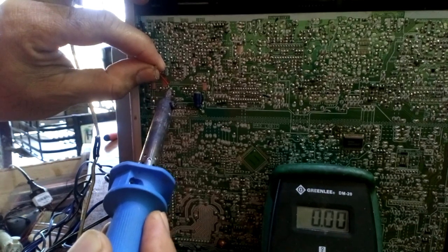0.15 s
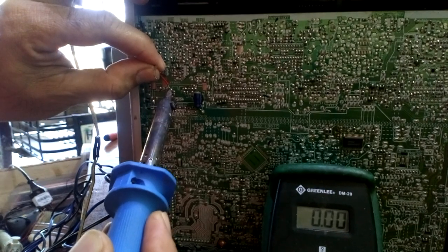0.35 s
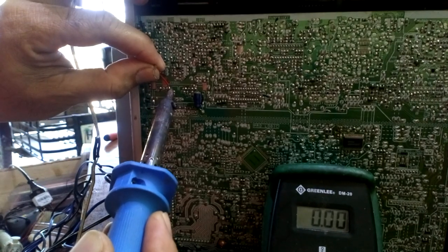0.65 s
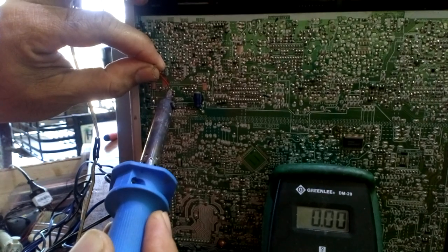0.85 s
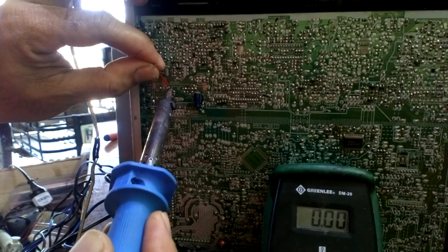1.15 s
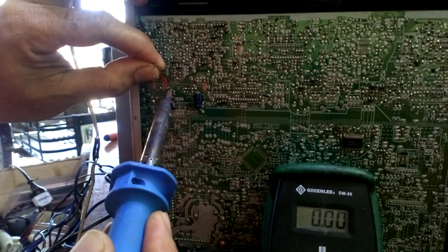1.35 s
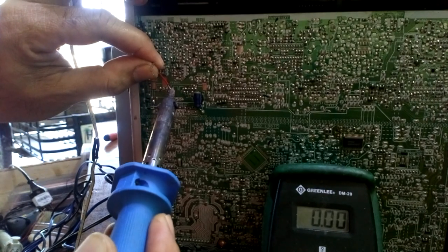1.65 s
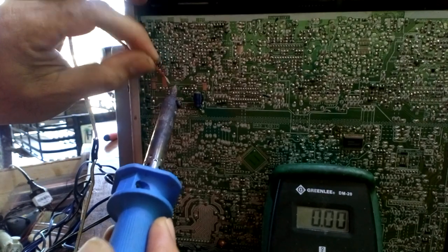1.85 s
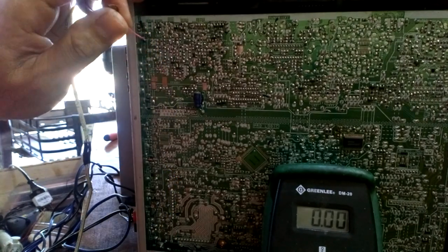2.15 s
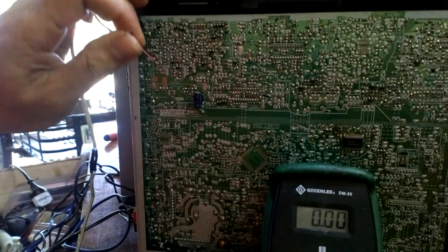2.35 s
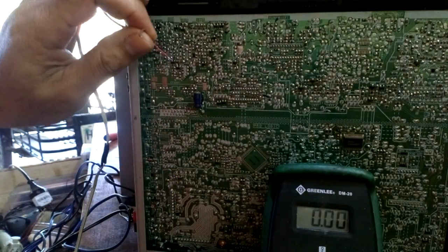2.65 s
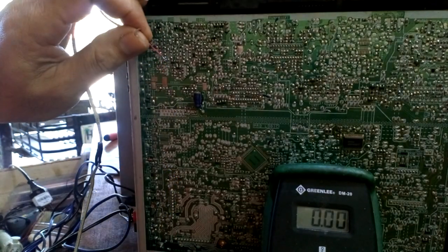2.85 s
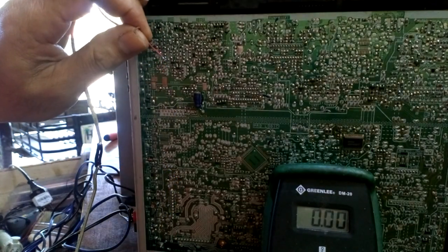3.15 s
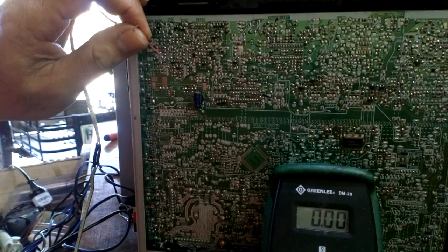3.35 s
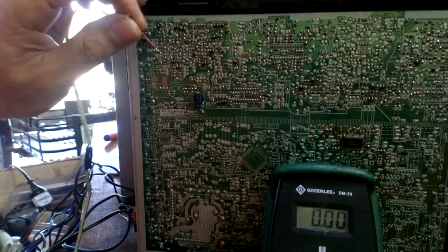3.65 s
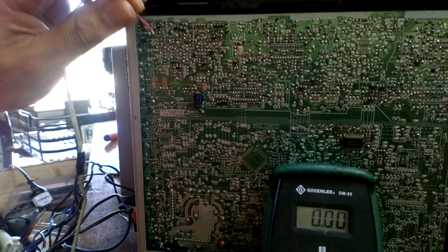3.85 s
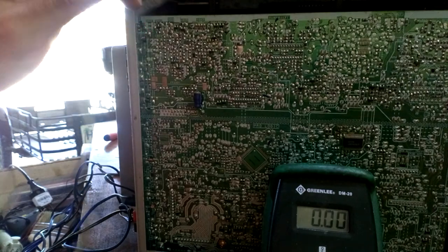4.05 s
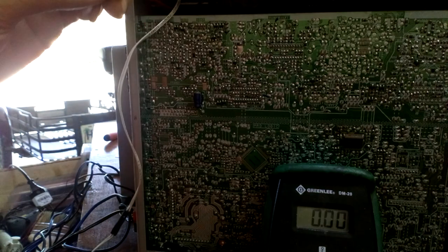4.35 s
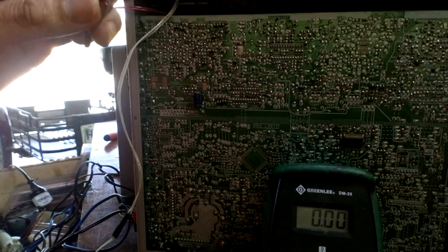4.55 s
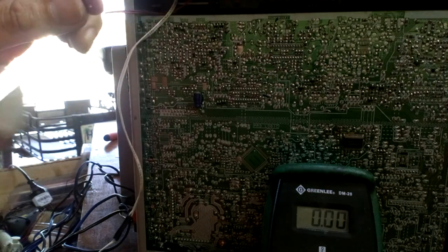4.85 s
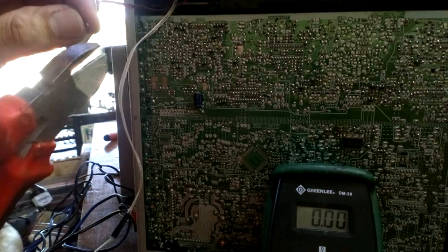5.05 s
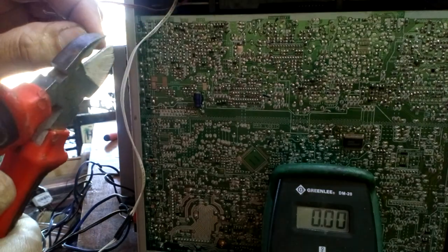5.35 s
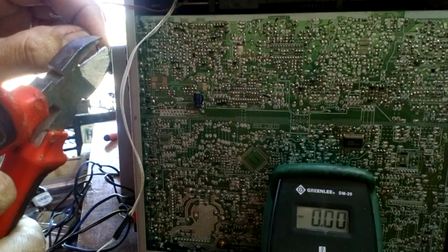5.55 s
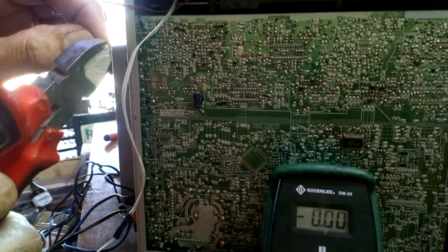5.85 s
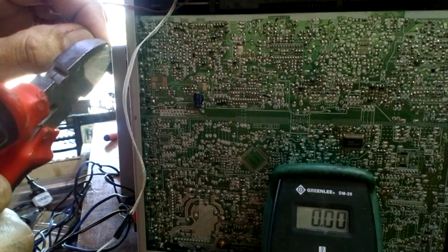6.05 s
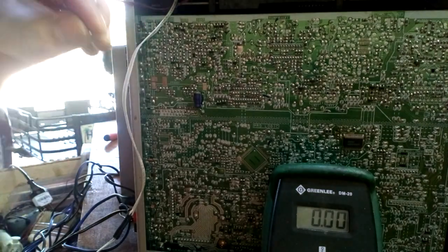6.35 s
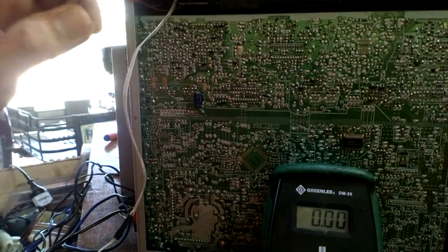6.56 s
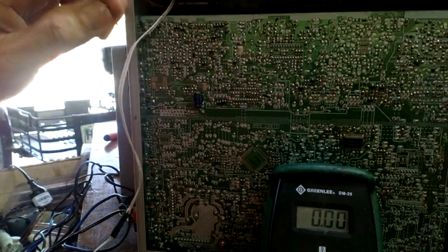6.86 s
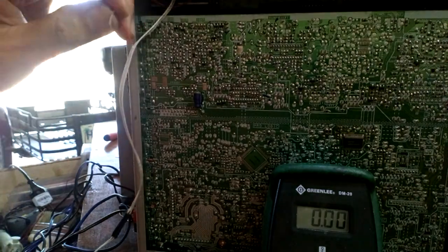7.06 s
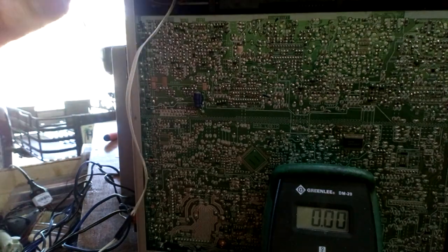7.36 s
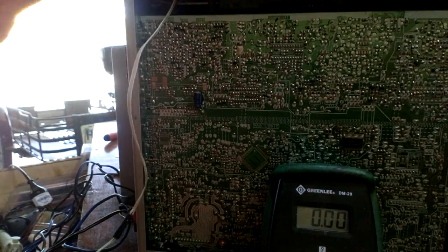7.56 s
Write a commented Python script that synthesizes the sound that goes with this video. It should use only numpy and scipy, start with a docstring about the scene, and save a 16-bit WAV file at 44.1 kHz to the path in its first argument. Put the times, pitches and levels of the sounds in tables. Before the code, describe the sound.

At a workbench in a small room, steady hiss and a very thin high whine continue under a distant rooster's falling last note. An engine outside slows to a low throb. After light clicks, a soldering iron knocks and scrapes into its springy metal stand, the coil ringing briefly. A hollow knock, soft rubs and tiny snips follow, then cutters clatter down onto the resonant bench. Close stereo microphones.

```python
"""Steady hiss and a thin electronic whine first; outside, a far rooster ends its crow and an engine slows down.
Place: a bench in a small room, two microphones near the work. Soft rubs and thumps, wire snips, an iron shoved
into its coil stand, then cutters dropped on the booming bench top. Air, friction and rubs are shaped noise;
engine, crow and whine are sums of harmonics; each contact is decaying modes plus noise bursts, and walls add
short echoes."""
import sys
import numpy as np
from scipy import signal
from scipy.fft import rfft, irfft, next_fast_len
from scipy.io import wavfile
from scipy.ndimage import map_coordinates

SR = 44100
rng = np.random.default_rng(int(sys.argv[2]) if len(sys.argv) > 2 else 0)


def waveform_to_disk(signal):
    """Save audio, clipped to [-1, 1], as 16-bit WAV at the path in sys.argv[1]."""
    frames = np.transpose(np.atleast_2d(signal))
    scaled = np.clip(frames, -1, 1) * 32767
    samples = np.round(scaled).astype(np.int16)
    wavfile.write(sys.argv[1], SR, samples)


N = 340011
TIME = np.arange(N) / SR  # s
AGE = np.arange(SR // 2) / SR  # s since one contact, half a second long


def amp(db):
    """Decibels to gain."""
    return 10 ** (np.asarray(db) / 20)


def unit(x):
    """Scaled to rms 1."""
    return x / np.sqrt(np.mean(x ** 2) + 1e-20)


def along(points, hz):
    """Value at hz, from (f/Hz, value) points on a log frequency axis."""
    f, v = np.transpose(points)
    return np.interp(np.log(hz + 1), np.log(f + 1), v)


def curves(rows):
    """One value per sample for each column after the time."""
    s, *cols = np.transpose(rows)
    return [np.interp(TIME, s, c) for c in cols]


def wobble(rate):
    """A smooth random curve, rate knots a second."""
    knots = rng.standard_normal(int(N * rate / SR) + 4)
    return map_coordinates(knots, [TIME * rate])


def filtered(x, response):
    """x times a response of frequency."""
    size = x.shape[-1]
    m = next_fast_len(size + 2048)  # padding keeps the end from wrapping onto the start
    return irfft(rfft(x, m) * response(np.fft.rfftfreq(m, 1 / SR)), m)[..., :size]


def noise(spectrum, alike, size):
    """Stereo noise of rms 1; the mid-side balance sets how alike the microphones are at each frequency."""
    def mid_side(hz):
        turn = np.arccos(np.clip(along(alike, hz), -1, 1)) / 2
        return amp(along(spectrum, hz)) * np.array([np.cos(turn), np.sin(turn)])

    mid, side = filtered(rng.standard_normal((2, size)), mid_side)
    return unit(np.array([mid + side, mid - side]))


# decay of the small room: f/Hz, t60/s
ROOM_DECAY = [(100, .42), (300, 0.29), (1000, 0.31), (3000, 0.4), (6000, 0.23), (10000, 0.19), (16000, .18)]


def room(x):
    """A diffuse tail in which each frequency dies at its own speed."""
    hz, t, z = signal.stft(rng.standard_normal((2, SR // 2)), SR, nperseg=256)
    decay = amp(-60 * t / along(ROOM_DECAY, hz)[:, None])
    tail = signal.istft(z * decay, SR, nperseg=256)[1]
    return signal.fftconvolve(np.atleast_2d(x), tail / np.linalg.norm(tail[0]), axes=1)[:, :N]


# steady air: f/Hz, relative level/dB per Hz
AIR_SPECTRUM = [(25, -11.5), (45, -16), (85, -2), (140, -11.5), (190, -11), (260, -15.5), (460, -23),
                (800, -24.5), (2000, -31.5), (5400, -32), (6800, -36), (8200, -44.5), (13000, -45.5),
                (15000, -36), (15900, -44.5)]
# the air at the two microphones: f/Hz, left-right likeness
AIR_LIKENESS = [(60, 0.89), (240, 0.54), (950, -0.031), (3770, -0.02), (15000, -0.17)]
# sounds other than the air at the two microphones: f/Hz, left-right likeness
SOUND_LIKENESS = [(150, .96), (300, .88), (450, .6), (700, .3), (1200, .05), (10000, -.1)]
# wisps of hiss with a narrow squeak, and one very short high ping:
# centre t/s, half-length/s, f/Hz, level/dB before fading and left-right tilt
HISS_WISPS = [(0.491, 0.23, 4470, -68), (1.147, 0.24, 4900, -67), (1.855, .33, 4880, -72),
              (2.247, 0.29, 4180, -63.5), (2.465, .22, 5900, -69), (2.649, .035, 3430, -60),
              (4.894, 0.12, 4530, -66.5), (6.329, .01, 5200, -55), (6.58, 0.35, 4600, -65)]
WISP_TONE_HZ, WISP_TONE_DB = 5200, -7.5  # the narrow squeak in each row, level against its hiss
# centres of the whine's swells: t/s
WHINE_SWELLS = [2.53, 4.65, 6.82, 7.5]
WHINE_HZ, WHINE_DB = 9055, -87  # second harmonic and overall level between swells
SWELL_WIDTH_S, SWELL_HZ, SWELL_DB = .2, 125, 5.5  # each swell lifts pitch and level together


def wisps():
    """Wisps of hiss with a narrow squeak, and one very short high ping, all leaning to the right."""
    out = np.zeros((2, N))
    squeak_band = [(1.03 * WISP_TONE_HZ, -80), (WISP_TONE_HZ, 0), (1.09 * WISP_TONE_HZ, -80)]
    for s, length, hz, db in HISS_WISPS:
        size = int(2 * length * SR)
        hiss_band = [(hz / 2, -22), (hz * 0.67, -5), (hz * 0.55, -7), (hz * 1.13, 0), (hz * 1.55, -25)]
        hiss = noise(hiss_band, SOUND_LIKENESS, size)
        squeak = noise(squeak_band, SOUND_LIKENESS, size)
        wisp = unit(hiss + amp(WISP_TONE_DB) * squeak) * np.hanning(size) ** 2
        out[:, int((s - length) * SR):][:, :size] += amp(db) * wisp * amp([[-3], [2]])
    return out


def whine():
    """A thin electronic tone of three harmonics, slightly unsteady, that swells now and then."""
    swell = sum(np.exp(-((TIME - s) / SWELL_WIDTH_S) ** 2) for s in WHINE_SWELLS)
    hz, db = WHINE_HZ + SWELL_HZ * swell, WHINE_DB + SWELL_DB * swell
    phase = np.pi * np.cumsum(hz + 8 * wobble(40)) / SR  # the fundamental lies an octave below hz
    fundamental = amp(1.5 + 2.1 * wobble(2.2)) * np.sin(phase)
    return amp(db) * unit(fundamental + np.sin(2 * phase) + amp(-4.5) * np.sin(3 * phase))


def background():
    """Nearly steady air noise with the wisps and the whine."""
    air = amp(-61.5 + 0.31 * wobble(6)) * noise(AIR_SPECTRUM, AIR_LIKENESS, N)
    return air + wisps() + whine()


# the hoarse high note breaks to a held one, which sags ever faster and dies away
HIGH_HZ, HELD_HZ, SAG_HZ_PER_S2 = 952, 808, 380
BREAK_S, BREAK_TIME_S, SAG_FROM_S, RELEASE_S = .07, 0.0091, 0.22, 0.67
CROW_DB, HIGH_NOTE_DB, CROW_FADE_DB_PER_S, RELEASE_DB_PER_S = -57, 6.5, 3, 83


def crow():
    """Pitch and level of the crow: high note, break, sagging held note, release."""
    high = (1 - np.tanh((TIME - BREAK_S) / BREAK_TIME_S)) / 2
    sag = SAG_HZ_PER_S2 * np.clip(TIME - SAG_FROM_S, 0, 1) ** 2
    hz = HELD_HZ + (HIGH_HZ - HELD_HZ) * high - sag
    release = RELEASE_DB_PER_S * np.maximum(TIME - RELEASE_S, 0)
    return hz, CROW_DB + HIGH_NOTE_DB * high - CROW_FADE_DB_PER_S * TIME - release


# the rooster's voice: harmonic, relative level/dB before its wobble
VOICE_HARMONICS = [(1, -10.5), (2, 1), (3, -33), (4, -10)]


def rooster():
    """The falling end of a far crow, hoarse at first, dulled by distance and blurred by echoes."""
    hz, db = crow()
    hoarse = .006 + .03 * np.exp(-TIME / .08)  # relative pitch jitter
    phase = 2 * np.pi * np.cumsum(hz * (1 + hoarse * wobble(250))) / SR
    voice = unit(sum(amp(level + 3.4 * wobble(8.74)) * np.sin(round(k) * phase)
                     for k, level in VOICE_HARMONICS))
    call = filtered(amp(db) * voice, lambda f: amp(along([(3000, -0.5), (3800, -14.5)], f)))
    return amp(-5.5) * call + amp(-3.5) * room(call)


# the engine runs down evenly to its idle (cycles a second, before a small random jitter)
START_HZ, SLOWING_HZ_PER_S, IDLE_HZ = 49.36, 5, 18.5
# exhaust colour: f/Hz, relative level/dB
EXHAUST_COLOUR = [(30, -27), (55, -8), (75, -3), (105, -2), (135, -5), (175, -6), (230, -20), (400, -33.5),
                  (900, -68.5)]
# engine loudness: t/s, level/dB of the drone before left-right tilt
ENGINE_LOUDNESS = [(0, -74.5), (1, -67), (2, -67.5), (3, -55), (4, -48.5), (5.5, -54), (5.8, -60.5),
                   (6.3, -56.5), (6.9, -64.5), (7.71, -52.5)]


def engine():
    """Wavering exhaust harmonics, second to tenth, over a rumble, as heard through the wall."""
    rate = np.maximum(START_HZ - SLOWING_HZ_PER_S * TIME, IDLE_HZ)
    db, = curves(ENGINE_LOUDNESS)
    phase = 2 * np.pi * np.cumsum(rate * (1 + 0.02046 * wobble(14))) / SR
    orders_db = [1.5, 1.5, 1.5, -6, -20.5, -2.0, -3.0, 0.5, -1.0]
    drone = 0
    for k, level in enumerate(orders_db, 2):
        strength = amp(level + along(EXHAUST_COLOUR, k * rate) + 3.2 * wobble(4))
        drone = drone + strength * np.cos(k * phase + .5 * wobble(2.5))
    drone = unit(drone * amp(2.5 * wobble(28)))
    rumble = noise(EXHAUST_COLOUR, SOUND_LIKENESS, N)
    return amp(db) * (drone + amp(-11.5) * rumble) * amp([[-1.2], [1.2]])


# soft rubs, lead-ins to contacts and dull thumps on the bench:
# centre t/s, half-length/s, low level/dB, high level/dB, both before fading
RUBS_AND_THUMPS = [(.829, 0.07, -60, -82), (2.977, 0.1, -62.5, -58.5), (3.103, 0.014, -41, -44.5),
                   (4.166, 0.072, -57.5, -57.5), (7.065, .014, -44, -66), (7.278, .012, -27.5, -50),
                   (7.307, .01, -25, -34), (7.609, 0.094, -56, -65)]


def rubs_and_thumps():
    """Soft rubs, lead-ins to contacts and dull thumps on the bench: low shuffle and dry swish."""
    out = np.zeros((2, N + SR))
    shuffle_band = [(80, -3), (170, -0.5), (700, -3.5), (1500, -38), (5000, -47)]
    swish_band = [(500, -24.0), (1000, 1), (5500, -11.5), (8000, -41.0)]
    for s, length, low_db, high_db in RUBS_AND_THUMPS:
        size = int(2 * length * SR)
        shuffle = amp(low_db) * noise(shuffle_band, SOUND_LIKENESS, size)
        swish = amp(high_db) * noise(swish_band, SOUND_LIKENESS, size)
        out[:, int((s - length) * SR):][:, :size] += (shuffle + swish) * np.hanning(size) ** 2
    return out[:, :N]


# snips and light clicks of steel: t/s, level/dB before the mix, brightness/dB,
# share passed to the bench/dB, pitch f/Hz, contact time/s
STEEL_CLICKS = [(2.045, -62, -13, -6, 1690, 0.0011), (2.181, -57, -2, -24, 1650, 0.0042),
                (2.833, -31, 0.5, -28.5, 947, 0.0022), (3.109, -40, -45, -13, 2053, 0.00025),
                (3.531, -33, 6.5, 8, 2805, 0.0034), (3.585, -34, 0, 2.5, 3140, 0.003),
                (3.624, -32.5, -4, -2.5, 1553, .0005), (3.7781, -43, -1.5, 6.5, 1610, 0.00054),
                (3.82, -52.5, 0, 2.5, 1630, 0.00055), (4.185, -49, 1.5, -6.5, 1600, 0.0084),
                (4.511, -35, -5.5, -8, 1666, 0.0048), (4.812, -65.5, -23, -12, 2740, 0.00036),
                (4.927, -56, 10.5, -6, 2715, 0.00057), (5.605, -59.5, -22, 3, 1602, 0.0045)]
GRIND_DB, GRIND_S = -22.5, 0.0095  # level against the click's, and width of the swell around it


def grinding():
    """A short soft grinding swells around each steel click."""
    swells = sum(amp(db + GRIND_DB) * np.exp(-((TIME - s) / GRIND_S) ** 2) for s, db, *_ in STEEL_CLICKS)
    grain = unit(amp(2.8 * wobble(300)))
    grind = noise([(500, -25), (1200, -3), (5000, -3.5), (8000, -17)], SOUND_LIKENESS, N)
    return swells * grain * grind


# blunt knocks on bench and stand: t/s, level/dB before the mix, hardness/dB, pitch f/Hz
BLUNT_KNOCKS = [(3.1089, -26, -2, 466), (3.1368, -31.5, -41, 426), (3.552, -20.5, -10, 495),
                (3.56, -22.5, -9, 496), (3.6294, -17.5, 0, 687), (3.666, -26, -6, 520),
                (3.729, -35.5, 14, 609), (3.767, -35, -24, 550), (3.839, -49.5, -16, 517),
                (4.122, -48.5, 15, 590), (4.158, -46.5, 10, 440), (4.3151, -16.5, -1.5, 558),
                (5.35, -68.5, -4, 482), (6.229, -62.5, 22, 300), (7.069, -16.5, -1, 558),
                (7.163, -24, -12.5, 457), (7.192, -24, -20, 476), (7.36, -29.5, -3.5, 462),
                (7.695, -54.5, 22, 448)]
# the cutters land on one jaw, then fall flat: t/s, level/dB before the mix, pitch f/Hz
CUTTER_DROPS = [(7.2821, -19, 1994), (7.3109, -16.5, 1600)]
# part levels of each kind of contact: thud, knock, clack, tick, fizz (level/dB)
KNOCK_PARTS = [-13, 0.5, -11, -22.5, -45.5]
CLICK_PARTS = [0.5, -6, -0.5, -0.5, -12]
DROP_PARTS = [-4.5, -10, 0.5, -16, -33]
# gain of those five parts per dB of hardness, of brightness and of bench share (dB per dB)
HARDNESS_GAIN = [0, 0.052, 0.25, 0.7, 1.15]
BRIGHTNESS_GAIN = [0.064, 0, 0, .35, 1]
BENCH_SHARE_GAIN = [1, 0.25, 0, 0.096, 0]
THUD_GROWTH = 0.63  # the heavy bench top gains less than a dB per dB of blow
KNOCK_CLACK_HZ, STEEL_KNOCK_HZ = 1907, 680  # the tool's pitch in a knock; the bench's pitch under steel
KNOCK_TIME_S, DROP_TIME_S = 0.00066, .0003  # how long these contacts take to build up


def blows():
    """Every contact as (t/s, five part levels/dB, knock f/Hz, clack f/Hz, contact time/s); hard is bright."""
    out = []
    for s, db, hardness, hz in BLUNT_KNOCKS:
        force = np.array([THUD_GROWTH * db, db, db, db, db])
        parts = force + KNOCK_PARTS + hardness * np.array(HARDNESS_GAIN)
        out.append((s, parts, hz, KNOCK_CLACK_HZ, KNOCK_TIME_S))
    for s, db, brightness, bench_db, hz, contact_time in STEEL_CLICKS:
        colour = brightness * np.array(BRIGHTNESS_GAIN) + bench_db * np.array(BENCH_SHARE_GAIN)
        out.append((s, db + colour + CLICK_PARTS, STEEL_KNOCK_HZ, hz, contact_time))
    for s, db, hz in CUTTER_DROPS:
        out.append((s, db + np.array(DROP_PARTS), STEEL_KNOCK_HZ, hz, DROP_TIME_S))
    return out


def blow(x):
    """Scaled to rms 1 over its first 20 ms."""
    return x / np.sqrt(np.mean(x[:, :SR // 50] ** 2) + 1e-20)


def ring(modes, scatter_db, detune, rise):
    """Struck modes at new strengths; the higher ones reach the two microphones out of step."""
    hz, db, t60 = np.transpose(modes)
    size, shift, side = rng.standard_normal((3, len(hz)))
    lag = np.arccos(np.clip(along(SOUND_LIKENESS, hz), -1, 1)) / 2 * np.sign(side)
    pitch = 2j * np.pi * hz * (1 + detune * shift)
    waves = np.exp(AGE * (pitch - np.log(1000) / t60)[:, None])
    strengths = amp(db + scatter_db * size) * np.exp(1j * np.outer([1, -1], lag))
    return blow((strengths @ waves).imag * (1 - np.exp(-AGE / rise)))


def bursts(spectrum, t60, room_db, rise, count):
    """One noise burst per contact: a quick decay, then the room's slower one."""
    loudest_hz = max(spectrum, key=lambda point: point[1])[0]
    room_t60 = along(ROOM_DECAY, loudest_hz)
    decay = amp(-60 * AGE / t60) + amp(room_db - 60 * AGE / room_t60)
    shape = decay * (1 - np.exp(-AGE / rise))
    source = noise(spectrum, SOUND_LIKENESS, N)
    return [blow(source[:, i:i + len(AGE)] * shape) for i in rng.integers(0, N - len(AGE), count)]


# echoes off bench and gear: left delay t/s, right delay t/s, level/dB against the direct sound
NEAR_ECHOES = [(.0011, .0008, -14.5), (.0024, .0019, -13), (.0035, .0031, -12.5), (.0046, .0053, -11.5),
               (.0074, .0067, -13), (.0095, .0102, -18)]


def walls(x):
    """Nearby surfaces return each sound within milliseconds, by another path to each microphone."""
    left, right, db = np.transpose(NEAR_ECHOES)
    echo = np.zeros((2, SR // 40))
    echo[:, 0] = 1
    delays = np.clip(np.array([left, right]) * SR, 1, echo.shape[1] - 1).astype(int)
    echo[[[0], [1]], delays] = amp(db)
    return signal.fftconvolve(x, echo / np.linalg.norm(echo[0]), axes=1)[:, :x.shape[1]]


# modes, before scatter and detuning: f/Hz, relative level/dB, t60/s
BENCH_TOP = [(124.66, 0.5, 0.36), (169, -7, .28), (204, -5, 0.47), (239, 2.5, 0.23), (259.2, -1.5, 0.25),
             (298, -10.5, 0.42), (352.8, -9.5, 0.24), (436, -9.5, 0.2995), (478, -18, 0.44),
             (510.5, -15, 0.13), (690, -19.5, 0.65)]
HOLLOW_PANEL = [(344.4, -4.5, 0.1), (445, -5, 0.18), (524.4, 2.5, 0.026), (624.3, -5.5, 0.086),
                (691.4, -3.5, .1), (765, -11.5, .1), (985, -8.5, .07), (1047, -11.5, 0.05)]  # the bench's hollow knock
STEEL_TOOL = [(1220, -6, .06), (1583, 3, .07), (1936, 2.5, 0.051), (1997, -3.5, .09), (2150, -1, .06),
              (2985, -5.5, 0.1), (3250, -9, 0.1), (3460, -12, 0.082)]
STEEL_JAWS = [(3480, -2, .12), (3920, 1.5, 0.18), (4240, -1, .1), (4600, 0, 0.16), (5290, -5, .14),
              (5400, 4, .12), (6300, -8, .07)]  # the thin high ring of the steel
# noise of each part of a contact: f/Hz, relative level/dB per Hz
THUD_NOISE = [(25, -36.5), (50, -27), (90, -9), (125, 0.5), (148, 0), (175, -2), (260, -6.5), (380, -20),
              (900, -71)]
KNOCK_NOISE = [(150, -40.5), (320, -4), (500, 3), (700, -4), (830, -14), (1100, -9.5), (1600, -34),
               (4000, -71)]
CLACK_NOISE = [(400, -39), (800, -6), (980, 0.5), (1130, -2.5), (1550, 1), (1750, -4.5), (2000, 0),
               (2500, -4), (3100, -5), (4500, -18), (9000, -64.5)]
TICK_NOISE = [(1500, -37), (3500, 0.5), (4700, -0.5), (5500, 1), (6600, -6.5), (7800, -16.5),
              (10000, -54.5)]
FIZZ_NOISE = [(5000, -39.5), (8000, -7), (10500, -4), (13000, -12), (14900, 2), (15500, 5), (16000, -16.5)]
STEEL_RING_DB = -5.5  # the struck spot's pitch within a clack


def contacts():
    """Each contact cracks, rings the tool and shakes the bench top; a slow contact swells, not snaps."""
    hits = blows()
    thuds = bursts(THUD_NOISE, t60=0.12, room_db=-5.5, rise=.003, count=len(hits))
    knocks = bursts(KNOCK_NOISE, t60=.05, room_db=-10, rise=0.0027, count=len(hits))
    clacks = bursts(CLACK_NOISE, t60=0.023, room_db=-13, rise=0.0011, count=len(hits))
    ticks = bursts(TICK_NOISE, t60=0.022, room_db=-16.5, rise=0.00073, count=len(hits))
    fizzes = bursts(FIZZ_NOISE, t60=0.029, room_db=-17.5, rise=.0005, count=len(hits))
    wood, steel = np.zeros((2, 2, N + SR))
    for k, (s, parts_db, knock_hz, clack_hz, contact_time) in enumerate(hits):
        thud_gain, knock_gain, clack_gain, tick_gain, fizz_gain = amp(parts_db)
        swell = 1 - np.exp(-AGE / max(contact_time, 1e-4))
        boom = ring(BENCH_TOP, scatter_db=3.0, detune=0.012, rise=0.0035)
        thud = amp(-4.5) * boom + amp(-5) * thuds[k]
        # the spot that is struck gives each blow its own short-lived pitch
        bench_spot = ring([(knock_hz, 0, .03)], scatter_db=1, detune=0.0057, rise=.01)
        panel = ring(HOLLOW_PANEL, scatter_db=4.0, detune=0.018, rise=0.0015)
        knock = amp(-4) * bench_spot + amp(-5.5) * panel + amp(-5.5) * knocks[k]
        spot_modes = [(clack_hz, 0, .03), (1.09 * clack_hz, -4, .025)]
        tool_spot = ring(spot_modes, scatter_db=-2, detune=0.0031, rise=0.0015)
        tool = ring(STEEL_TOOL, scatter_db=0, detune=0.0092, rise=0.00092)
        clack = amp(STEEL_RING_DB) * tool_spot + amp(-10) * tool + amp(-5.0) * clacks[k]
        jaws = ring(STEEL_JAWS, scatter_db=3.5, detune=0.012, rise=.001)
        tick = amp(-14.5) * jaws + amp(-1.0) * ticks[k]
        span = slice(round(s * SR), round(s * SR) + len(AGE))
        wood[:, span] += swell * (thud_gain * thud + knock_gain * knock)
        steel[:, span] += swell * (clack_gain * clack + tick_gain * tick + fizz_gain * fizzes[k])
    return wood[:, :N] + walls(steel[:, :N])


# the stand's coil, before scatter and detuning: f/Hz, relative level/dB, t60/s
COIL_MODES = [(468, 1.5, 0.38), (510, -16.5, 1.4), (560, -19.5, 1.1), (644, 2, .3), (746, 0, 0.44),
              (808, -23, 0.97), (883, -25.5, 1.5), (1380, -35, 1.3), (2050, -24.5, .3), (2700, -25, .3),
              (3210, -20.5, .36), (5226, -33, .25)]
# the iron strikes the coil: t/s, level/dB
COIL_STRIKES = [(3.112, -35), (3.56, -33.5), (3.631, -27.5)]
SEATED = 3.82  # the iron comes to rest and damps the coil (s)


def spring():
    """The coil of the stand sings on after each strike until the iron is seated."""
    out = np.zeros((2, N))
    for s, db in COIL_STRIKES:
        coil = ring(COIL_MODES, scatter_db=1, detune=.001, rise=.002)
        out[:, round(s * SR):][:, :len(AGE)] += amp(db) * coil
    return out * amp(-200 * np.maximum(TIME - SEATED, 0))


SHOVE_RISE_DB_PER_S, SHOVE_SAG_DB_PER_S, SHOVE_STOP_DB_PER_S = 900, 101, 1199


def shove(s, length, db):
    """Friction of one shove: it grips quickly, eases as the iron moves, and stops."""
    age = TIME - s
    rise = SHOVE_RISE_DB_PER_S * np.minimum(age, 0)
    sag = SHOVE_SAG_DB_PER_S * np.maximum(age, 0)
    stop = SHOVE_STOP_DB_PER_S * np.maximum(age - length, 0)
    return amp(db + rise - sag - stop)


# shoves of the iron into its stand: t/s, length/s, peak friction level/dB before the mix
IRON_SHOVES = [(3.555, 0.054, -22), (3.628, .065, -27.5), (3.719, 0.073, -39)]


def slide():
    """The iron judders along its stand: slips drum on the bench and rasp in the metal."""
    friction = sum(shove(*row) for row in IRON_SHOVES)
    slips = friction * unit(amp(3.7 * wobble(170)))
    drum_band = [(25, -34.0), (50, -38.0), (120, -4.5), (165, 6.0), (220, -15), (260, -3.5),
                 (350, -8.0), (510, -2.0), (720, -6), (1200, -15.5), (3000, -46.0)]
    rasp_band = [(600, -26.5), (1150, -7.5), (1550, -2), (2200, 0), (3200, 0.5),
                 (5500, -6.5), (8000, -12.5), (13000, -27.5), (15000, -17.5), (16000, -24)]
    drum = slips * noise(drum_band, SOUND_LIKENESS, N)
    rasp = walls(slips * noise(rasp_band, SOUND_LIKENESS, N))
    dry = amp(1.0) * drum + amp(-11.0) * rasp
    return dry + amp(-11.0) * room(dry)


# lean of the bench sounds between the microphones: f/Hz, left minus right level/dB
BENCH_LEAN = [(100, -1.5), (300, 0.5), (440, 0.5), (570, 2), (780, 3), (1200, -2), (2500, -3.5),
              (5300, -10), (7000, -6), (9000, 4.5), (15000, -0.5)]


def scene():
    """The bench sounds reach each microphone with its own colour; the rest is added as it is."""
    bench = rubs_and_thumps() + grinding() + contacts() + spring() + slide()
    bench = filtered(bench, lambda hz: amp(np.outer([.5, -.5], along(BENCH_LEAN, hz))))
    return background() + rooster() + engine() + bench


TOP_HZ = 15900  # band limit of the microphone chain


def record(dry):
    """A steep low-pass leaves almost nothing above the band limit."""
    return filtered(dry, lambda hz: 1 / (1 + (hz / TOP_HZ) ** 120))


dry = scene()
out = record(dry)
waveform_to_disk(out)
```